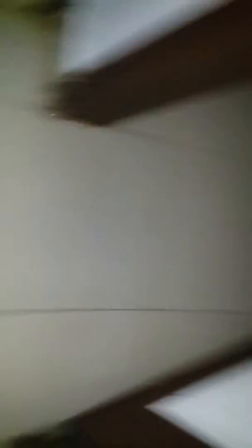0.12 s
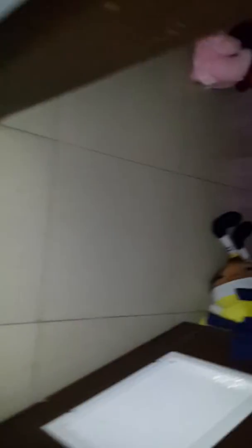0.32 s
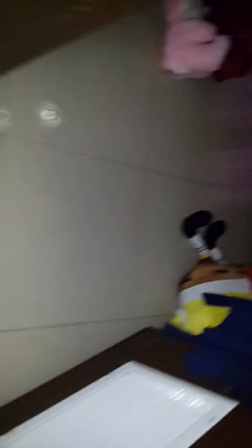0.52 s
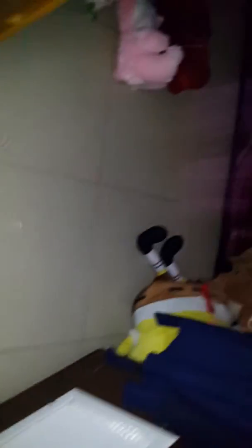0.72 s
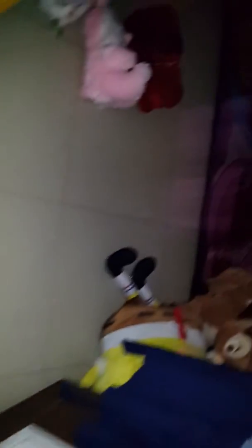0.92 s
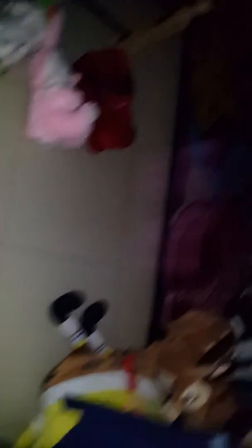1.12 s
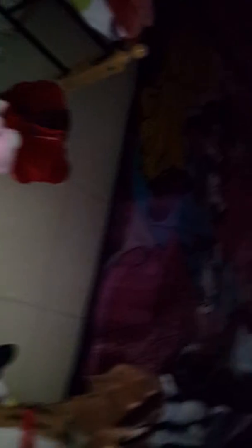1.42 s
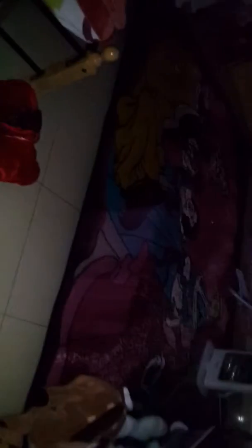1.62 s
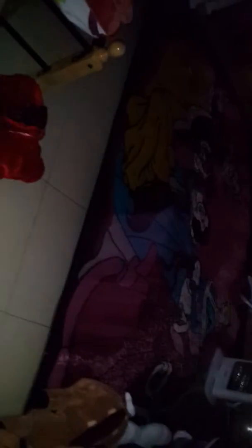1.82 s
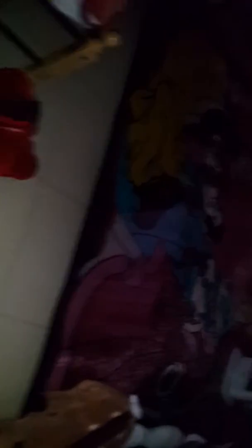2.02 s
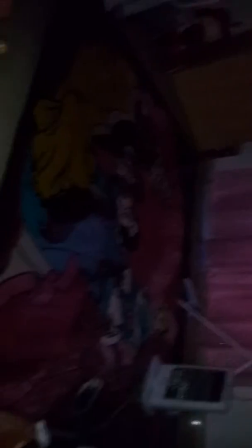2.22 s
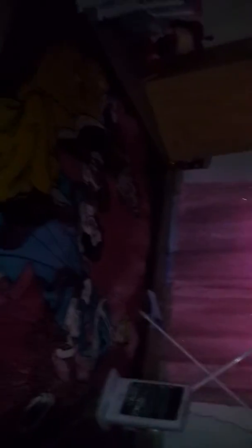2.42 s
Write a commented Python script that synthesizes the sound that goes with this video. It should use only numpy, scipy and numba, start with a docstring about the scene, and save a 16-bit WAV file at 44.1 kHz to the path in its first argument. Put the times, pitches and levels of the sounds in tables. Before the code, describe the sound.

Bare feet wade through shallow water in a small tiled room. After a few drips come two splashing, gurgling strides, a brief lull, then a softer one. The sound is close, with a short echo.

```python
"""Drops tick over a faint hush of lapping water, then bare feet splash through a small flooded room.
Each stride entrains air, and the bubbles resonate: large pockets slosh, smaller ones gurgle, single
ones plop and glide upward. Tiny drops crackle as they strike the surface. Hard tiled walls add a
short reverberation, and the microphone ports of a hand-held phone resonate near 6 kHz."""
import sys
import numpy as np
from scipy import signal
from scipy.fft import rfft, irfft, next_fast_len
from scipy.io import wavfile
from scipy.ndimage import uniform_filter1d, map_coordinates
from numba import njit

SR = 44100
rng = np.random.default_rng(int(sys.argv[2]) if len(sys.argv) > 2 else 0)


def int16_out(signal):
    """Quantize to a 16-bit WAV file."""
    q = np.round(np.clip(np.atleast_2d(signal).T, -1, 1) * 32767)
    wavfile.write(sys.argv[1], SR, q.astype(np.int16))


N = 114660
SWELL_CYCLES = 1.88  # time constant of a bubble's onset


def undb(db):
    """Logarithmic level: decibels to amplitude ratio."""
    return 10 ** (np.asarray(db) / 20)


def level_at(table, hz):
    """Interpolation of a spectrum along log frequency."""
    table_hz, db = np.array(table).T
    return np.interp(np.log(np.maximum(hz, 1)), np.log(table_hz), db)


def shape(x, gain_db):
    """Linear filtering: the spectrum is multiplied by a gain at each frequency."""
    size = next_fast_len(N + 4096)
    hz = np.arange(size // 2 + 1) * SR / size
    return irfft(rfft(x, size) * undb(gain_db(hz)), size)[..., :N]


def unit(x):
    """Normalisation to rms 1."""
    return x / np.sqrt(np.mean(x ** 2))


@njit
def ring(start_s, size, hz, cycles, rise_octaves, swell_cycles):
    """Damped oscillation: each sine swells, then decays by 60 dB while its pitch climbs."""
    out = np.zeros(N)
    for k in range(len(start_s)):
        length = max(cycles[k], .5) * SR / hz[k]
        decay, climb = np.exp(-np.log(1000) / length), 2 ** (rise_octaves[k] / length)
        shut, opening = 1., np.exp(-hz[k] / (swell_cycles * SR))
        phase, step = 0., 2 * np.pi * hz[k] / SR
        amplitude, first = 2 * size[k], int(start_s[k] * SR)
        for j in range(first, min(first + int(length), N)):
            out[j] += amplitude * (1 - shut) * np.sin(phase)
            phase += step
            step = min(step * climb, 2.8)
            amplitude *= decay
            shut *= opening
    return out


def swarm(count, lo_hz, hi_hz, cycles, rise_octaves, tilt, scatter_db):
    """Incoherent superposition: bubbles ring at random times, scattered about a typical decay and rise."""
    when, pitch, strength, life, glide = rng.random((count, 5)).T
    hz = lo_hz * (hi_hz / lo_hz) ** pitch
    size = hz ** tilt * undb(scatter_db * np.minimum(-np.log(1 - strength), 3.))
    lifetimes = cycles * (0.34 + 1.37 * life)
    return unit(ring(when * N / SR, size, hz, lifetimes, rise_octaves * 2 * glide, SWELL_CYCLES))


# Levels of the water sounds and of a background rumble that mostly dips at loud splashes (time [s],
# low gurgle [dB], high gurgle [dB], spray [dB], fine spray [dB], slosh [dB], rumble [dB])
LAYER_LEVELS = [(0.0, -72.5, -68.5, -61, -62.5, -66, -69.5), (0.2, -70, -71, -64.5, -65.5, -77, -64.5),
                (0.23, -64, -57, -54, -57, -72, -75), (0.26, -47, -38, -38.5, -33.5, -86, -79),
                (0.28, -46.5, -47, -43, -46, -76, -73), (0.31, -50.5, -43.5, -42, -46, -71, -61),
                (0.36, -42, -44, -36, -42.5, -52, -70), (0.4, -45.5, -44.5, -33, -43, -53, -75),
                (0.42, -41, -42, -34.5, -45.5, -44, -73), (0.46, -51, -39.5, -48, -49, -53, -60),
                (0.48, -60, -43, -38.5, -42, -53, -69), (0.51, -36, -43, -40, -53, -43.5, -71),
                (0.53, -32, -41, -43.5, -41.5, -43, -63), (0.56, -39, -35.5, -31, -43, -62, -73),
                (0.58, -43.5, -43, -31.5, -32.5, -56, -90), (0.61, -49, -30.5, -26, -35, -60, -87),
                (0.64, -46, -44, -49, -44, -71, -80), (0.67, -45.5, -44.5, -38, -41.5, -71, -62),
                (0.72, -44.5, -40, -41, -45.5, -70, -61), (0.77, -57, -53.5, -52.5, -51, -63, -66),
                (0.8, -39, -44, -47.5, -48.5, -64, -55), (0.89, -44, -42, -44.5, -48.5, -65.5, -60),
                (0.95, -45.5, -46.5, -38, -46, -61, -62), (0.97, -41, -37.5, -37.5, -52, -58, -60),
                (1.01, -35, -35.5, -31.5, -36, -49.5, -64), (1.04, -33.5, -26.5, -25.5, -34.5, -53, -40),
                (1.07, -33, -35.5, -39.5, -36.5, -34.5, -115), (1.1, -36.5, -31.5, -29.5, -32.5, -50, -53),
                (1.13, -34, -38, -34.5, -38, -43, -62), (1.15, -41.5, -31, -28.5, -34, -46, -69),
                (1.19, -46, -42, -43, -40, -58, -60), (1.24, -41.5, -33.5, -30.5, -37, -62, -62),
                (1.27, -50, -63, -36, -42.5, -55, -86), (1.32, -46, -38, -43.5, -56, -74, -59.5),
                (1.4, -58, -48, -49, -40.5, -70, -63), (1.48, -62.5, -64.5, -53, -52, -63.5, -62),
                (1.71, -68.5, -65, -57.5, -62, -69.5, -65.5), (1.82, -44.5, -45, -47.5, -53.5, -58, -63),
                (1.86, -44, -49.5, -48, -51.5, -61.5, -61), (1.93, -53, -47, -52.5, -58, -74, -64.5),
                (1.98, -44.5, -37, -37, -43.5, -62, -62.5), (2.05, -45.5, -43.5, -38, -43, -61, -72),
                (2.14, -45.5, -43, -44.5, -46, -72, -58), (2.21, -45.5, -42, -42, -53, -55, -59),
                (2.24, -57, -46, -46, -49.5, -60, -53.5), (2.38, -56.5, -53.5, -53.5, -55.5, -62, -57.5),
                (2.44, -73, -72, -63, -66, -71, -59), (2.6, -84, -81, -67, -64, -74, -73)]
def layer_gain(column):
    """Amplitude envelope: one layer's level, interpolated to a gain per sample."""
    rows = np.array(LAYER_LEVELS)
    return undb(np.interp(np.arange(N) / SR, rows[:, 0], rows[:, column]))


# Spectrum of lapping water (frequency [Hz], relative level [dB])
HUSH_SPECTRUM = [(76, -31), (130, -38), (193, 7), (357, -1), (765, 5), (839, 8.5), (982, -6), (3000, -7),
                 (3900, -56), (6600, -120)]
def hush():
    """Partly coherent noise at the two ports: a steady murmur and a rumble that comes and goes."""
    sides = np.array([[1], [-1]])
    mid, side = unit(shape(rng.standard_normal((2, N)),
                           lambda f: level_at(HUSH_SPECTRUM, f) - 60. * (f > 3300) - 40. * (f < 170)))
    low, low_side = unit(shape(rng.standard_normal((2, N)),
                               lambda f: 3.1 * np.log2(f / 170 + .01) - 60. * (f > 175)))
    murmur = undb(-65.5) * (mid + .6 * side * sides)
    rumble = (low + 0.37 * low_side * sides) * layer_gain(column=6)
    return murmur + rumble


def slosh():
    """Resonance falls with bubble size: large air pockets closing behind the legs ring low."""
    pockets = swarm(800, lo_hz=184.6, hi_hz=374, cycles=21.5, rise_octaves=0.14, tilt=0.45, scatter_db=.7)
    return unit(shape(pockets, lambda f: -30. * (f < 170))) * layer_gain(column=5)


def surge(rate_hz, depth_db):
    """Random amplitude modulation: water lands in handfuls, mostly small, now and then large."""
    hold = int(SR / rate_hz)
    heights = np.minimum(rng.exponential(size=N // 50), 3.5)
    return undb(depth_db * uniform_filter1d(np.repeat(heights, hold)[:N], hold // 2))


# Spray and ticks through the microphone port's resonance near 6 kHz (frequency [Hz], relative level [dB])
SPRAY_COLOUR = [(2800, -9.5), (3500, -12.5), (4200, -5.5), (5000, -6), (5800, 0.5), (6500, -5.5),
                (8000, -6), (10000, -12), (12000, -15), (14700, -27)]
def spray():
    """Impact noise: tiny drops crackle on the surface over a hiss; the finest swell on their own."""
    crackle = swarm(2500, lo_hz=2944, hi_hz=14640, cycles=36, rise_octaves=0.033, tilt=1.35, scatter_db=1)
    drops = crackle + undb(-0.5) * rng.standard_normal(N)
    body = shape(drops, lambda f: level_at(SPRAY_COLOUR, f) - 60. * ((f < 3300) | (f > 7700)))
    fine = shape(drops, lambda f: level_at(SPRAY_COLOUR, f) - 60. * (f < 7700))
    body = unit(body * surge(rate_hz=160, depth_db=4.7))
    fine = unit(fine * surge(rate_hz=190, depth_db=4.06))
    return body * layer_gain(column=3) + fine * layer_gain(column=4)


def gurgle():
    """Air entrainment: the shins drag bubbles under, larger and smaller ones at their own times."""
    low = swarm(450, lo_hz=343, hi_hz=1397, cycles=26.6, rise_octaves=0.44, tilt=1.53, scatter_db=4.5)
    high = swarm(900, lo_hz=1380, hi_hz=3495, cycles=20, rise_octaves=0.5, tilt=.7, scatter_db=4.0)
    return low * layer_gain(column=1) + high * layer_gain(column=2)


# Sharp drop ticks (time [s], level [dB], ring frequency [Hz], crack decay [s], crack over ring [dB])
DROP_TICKS = [(0.1231, -43.5, 5860, 0.017, 2), (0.2235, -31, 6040, 0.019, -3),
              (0.2357, -28.5, 5400, 0.019, 10.5), (0.4803, -27, 3290, 0.024, -2),
              (0.5112, -18.5, 6100, 0.016, -5), (0.5424, -18, 4670, 0.02, -14),
              (0.5478, -10.5, 4560, 0.017, -7.5), (0.5823, -16, 5880, 0.014, -3),
              (0.6246, -11, 5900, 0.016, -22), (0.8031, -27.5, 5860, 0.016, 4),
              (0.8626, -26, 5560, 0.016, -12), (0.8992, -24.5, 5970, 0.019, 4.5),
              (0.9465, -25, 5500, 0.014, -5), (0.9779, -21, 5160, 0.018, -5),
              (1.0122, -20.5, 5990, 0.035, 3.5), (1.051, -23, 6550, 0.014, -2),
              (1.089, -13.5, 5940, 0.014, 4), (1.134, -15, 5800, 0.015, -4), (1.151, -25, 5440, 0.012, 4),
              (1.1847, -21, 6400, 0.016, 2), (1.223, -20.5, 5650, 0.016, 6), (1.25, -22, 5460, 0.016, 0),
              (1.2609, -22, 5270, 0.018, 7.5), (1.311, -16, 7800, 0.016, -4),
              (1.3154, -18, 5870, 0.018, 1.5), (1.3432, -24.5, 6300, 0.015, 1.5),
              (1.3526, -24, 5370, 0.017, -3), (1.3897, -29, 6560, 0.015, 2),
              (1.4177, -21.5, 5800, 0.016, 3), (1.4215, -18.5, 6210, 0.019, -3),
              (1.6184, -38, 5900, 0.017, -14), (1.6623, -35.5, 5600, 0.016, -6),
              (1.7536, -23.5, 5660, 0.028, -11.5), (1.8642, -36.5, 6050, 0.014, 6.5),
              (1.951, -19, 5930, 0.016, -5), (1.9638, -26, 6300, 0.016, -10),
              (1.9895, -19.5, 5900, 0.012, -2.5), (2.0423, -22.5, 5820, 0.013, 2),
              (2.0542, -20.5, 5960, 0.014, 1), (2.075, -24, 5440, 0.014, -2), (2.11, -21, 6250, 0.015, -2),
              (2.152, -23, 5170, 0.015, 2.5), (2.1947, -26, 8950, 0.012, 0), (2.224, -30, 5350, 0.014, 4.5),
              (2.2596, -28, 6170, 0.019, -3), (2.3146, -27.5, 6640, 0.013, 7.5),
              (2.3356, -19.5, 6200, 0.015, -4), (2.4924, -24, 7300, 0.011, -16)]
def ticks():
    """Impulse excitation: a broadband crack with a brief ring, mostly the microphone's resonance."""
    ring_share, swell_s = 0.43, 0.0011
    start_s, db, hz, fade_s, crack_db = np.array(DROP_TICKS, float).T.copy()
    rise_octaves = np.full(len(hz), 0.14)
    tone = ring(start_s, undb(db), hz, ring_share * fade_s * hz, rise_octaves, swell_cycles=2.5)
    envelope = np.zeros(N)
    t = np.arange(1500) / SR
    onset = 1 - np.exp(-t / swell_s)
    for k in range(len(start_s)):
        first = int(start_s[k] * SR)
        envelope[first:first + len(t)] += undb(db[k] + crack_db[k] - 60 * t / fade_s[k]) * onset
    crack = shape(rng.standard_normal(N), lambda f: 0.99 * level_at(SPRAY_COLOUR, f) - 70. * (f < 2800))
    return tone + envelope * unit(crack)


# Single bubbles (time [s], level [dB], starting pitch [Hz], decay [cycles], rise [octaves])
BUBBLES = [(.241, -14, 1430, 10.7, 0.24), (.241, -30.5, 1010, 21, .3), (0.24, -14.5, 1850, 11.3, 0.27),
           (0.242, -24, 2730, 15, 0.13), (0.346, -34, 378, 21, 0.22), (0.354, -20.5, 1730, 14, 0.2),
           (.38, -25.5, 410, 12, 0.23), (.415, -28, 980, 6.7, .3), (.415, -44, 237, 13, 0.43),
           (0.425, -15.5, 1955, 32, 0.15), (0.478, -21, 1940, 19, 1.4), (.502, -23.5, 720, 23, .3),
           (0.506, -25, 256, 6.8, .8), (0.516, -26.5, 1100, 69, 2.9), (.546, -20, 4440, 48, 0.42),
           (0.545, -16.5, 867, 29, 0.13), (0.546, -14.5, 1058, 19, 0.18), (.578, -20, 1850, 28, .2),
           (.596, -28.5, 928, 26, 0.33), (.61, -32, 1585, 85, 2.6), (.667, -27.5, 860, 44, 1.2),
           (0.723, -28.5, 1070, 36, 0.22), (.796, -11, 1010, 9.1, 0.27), (0.804, -11, 1130, 16.6, 0.17),
           (0.803, -29, 531, 27, 0.29), (0.819, -15.5, 2000, 20.4, 0.28), (0.821, -24.5, 1138, 41, 0.16),
           (.845, -14, 1126, 16, 0.37), (.812, -26, 3700, 27, 0.22), (.85, -23.5, 2100, 44, 0.36),
           (0.891, -25, 1335, 33, 0.17), (.922, -26, 1820, 38, 0.17), (.971, -19, 790, 15, 0.2),
           (1.004, -14.5, 960, 15, 0.46), (1.011, -17, 2660, 62, 0.13), (1.024, -18, 1320, 26, 0.24),
           (1.035, -30.5, 196.3, 20, 0.13), (1.045, -12, 1040, 18.5, 0.39), (1.061, -2.5, 1030, 8.1, 0.78),
           (1.08, -16, 1110, 9.7, 0.36), (1.125, -16, 1410, 22, 0.67), (1.15, -20, 2270, 36, 0.21),
           (1.158, -19, 954, 23, 0.16), (1.188, -26.5, 713, 50, 0.16), (1.194, -18, 1480, 22, 0.25),
           (1.223, -24, 1540, 26, 0.22), (1.255, -20.5, 2540, 67, 0.092), (1.259, -15.5, 1650, 37, 0.24),
           (1.358, -27, 1390, 13, 0.17), (1.394, -32.5, 1650, 32, .3), (1.4, -33, 3070, 31, .2),
           (1.424, -29.5, 1620, 32, 0.22), (1.733, -38, 810, 15, 0.25), (1.752, -34, 1104, 31, 0.98),
           (1.756, -23, 5140, 70, .2), (1.763, -30.5, 635, 29, 2.44), (1.784, -34, 1040, 54, 2),
           (1.82, -26, 1860, 22, 0.3), (1.848, -14.5, 1240, 11.2, 1.1), (1.864, -18, 1760, 20, 1.15),
           (1.938, -32, 2190, 35, 0.22), (1.951, -19.5, 1367, 53, 0.12), (1.964, -28, 3300, 29, 0.33),
           (1.979, -35.5, 440, 27, .4), (1.979, -24, 1200, 30, 0.37), (1.988, -26, 1540, 38, .2),
           (2.015, -27, 725, 27, 0.43), (2.016, -24, 3580, 30, .2), (2.03, -28, 1770, 21, .3),
           (2.111, -36, 1700, 20, .2), (2.132, -35, 1920, 20, 0.22), (2.151, -23, 966, 14, 0.21),
           (2.152, -25.5, 2235, 48, 0.11), (2.192, -36, 1610, 63, 0.17), (2.19, -53, 481, 82, 0.069),
           (2.283, -43, 696, 70, 3.7), (2.315, -18.5, 2180, 11, 0.44), (2.36, -46, 592, 65, 2.66)]
def plops():
    """Bubble resonance: trapped air is the spring and the surrounding water the mass."""
    start_s, db, hz, cycles, rise_octaves = np.array(BUBBLES, float).T.copy()
    return ring(start_s, undb(db), hz, cycles, rise_octaves, SWELL_CYCLES)


def room(x, right_delay_s, echo_db):
    """Reverberation: diffuse reflections from the tiles decay exponentially after the direct sound."""
    t60_s, treble_t60_s, first_echo_s = 0.18, 0.17, 0.0023
    t = np.arange(int(.4 * SR)) / SR
    left, right, common = rng.standard_normal((3, len(t)))
    noise = np.array([left, right])
    # long waves reach both ports alike
    noise += signal.sosfilt(signal.butter(2, 800, fs=SR, output="sos"), common - noise)
    dark = signal.sosfilt(signal.butter(2, 2500, fs=SR, output="sos"), noise)
    tail = dark * undb(-60 * t / t60_s) + (noise - dark) * undb(-60 * t / treble_t60_s)
    tail *= t > first_echo_s
    tail = undb(echo_db) * tail / np.sqrt(np.sum(tail ** 2) / 2)
    delayed = map_coordinates(x, [np.arange(N) - right_delay_s * SR], order=3)
    return np.array([x, delayed]) + signal.fftconvolve(x[None], tail)[:, :N]


def scene():
    """Superposition: three patches of water around the legs, each placed by its delay between ports."""
    delays_s, near_echo_db = (0.0003003, .00004, -0.000241), -6
    patches = sum(room(gurgle() + spray(), delay, echo_db=0) for delay in delays_s) / np.sqrt(3)
    near = room(plops(), delays_s[0], near_echo_db) + room(ticks(), delays_s[0], near_echo_db)
    return patches + near + room(slosh(), delays_s[1], near_echo_db) + hush()


# Balance of the microphone ports (frequency [Hz], left relative to right [dB])
PORT_BALANCE = [(200, 1.5), (400, 2.5), (700, -1), (1000, 7), (1400, 6), (2000, 8.5), (2800, 0.5),
                (3500, 0.5), (4200, -1.5), (5000, 15.5), (6000, 10.5), (6500, 14), (7000, 4), (8000, -8),
                (10000, -4.5), (13000, -10), (14500, -11)]
def record(dry):
    """Frequency response: the two ports colour the sound oppositely, and a low-pass cuts the top."""
    top_hz = 14800
    ports = shape(dry, lambda f: level_at(PORT_BALANCE, f) * np.array([[.5], [-.5]]))
    return signal.sosfilt(signal.ellip(12, .2, 100, top_hz, fs=SR, output="sos"), ports)


dry = scene()
out = record(dry)
int16_out(out)
```